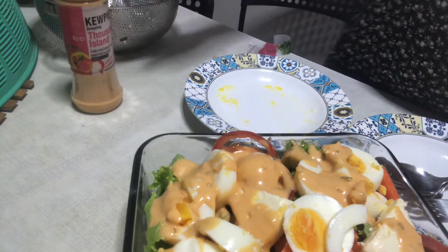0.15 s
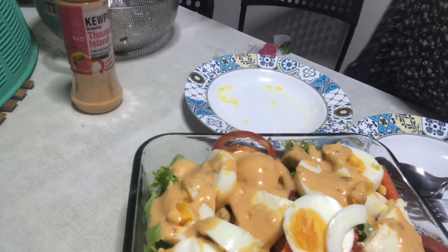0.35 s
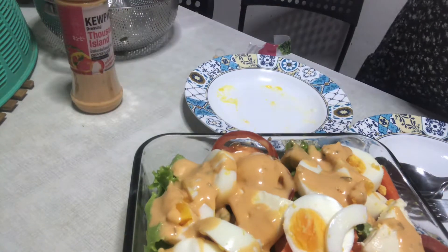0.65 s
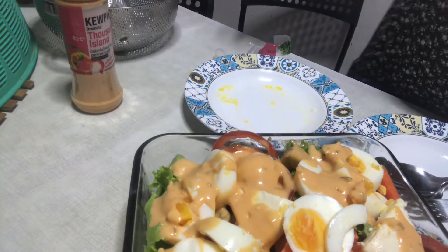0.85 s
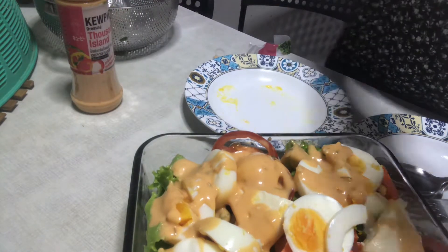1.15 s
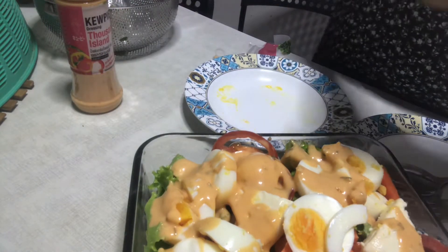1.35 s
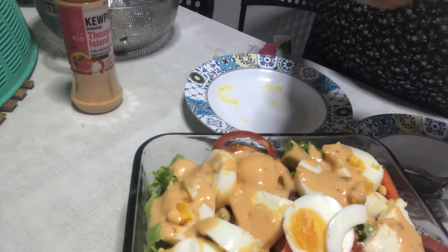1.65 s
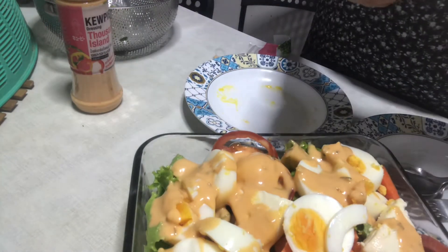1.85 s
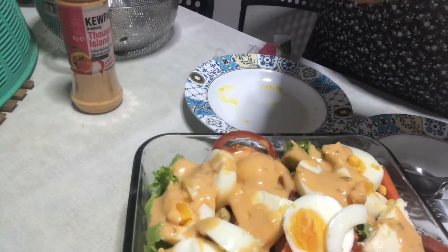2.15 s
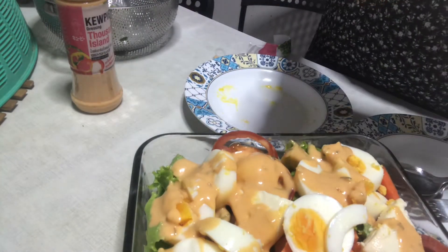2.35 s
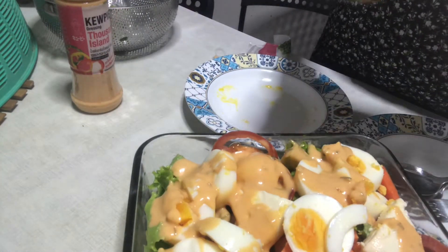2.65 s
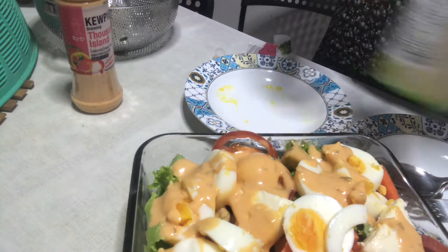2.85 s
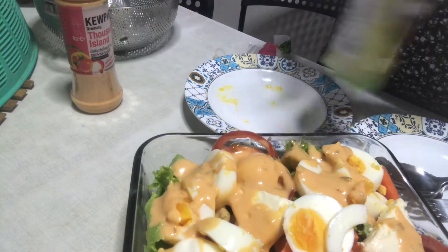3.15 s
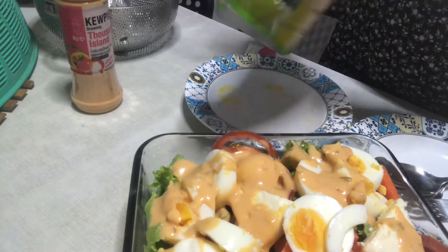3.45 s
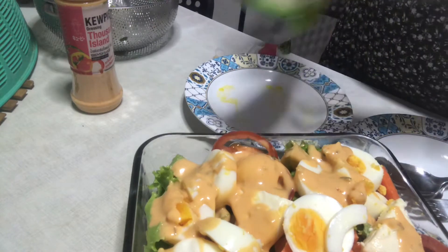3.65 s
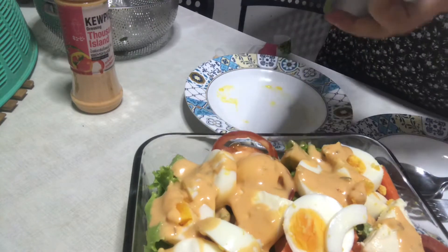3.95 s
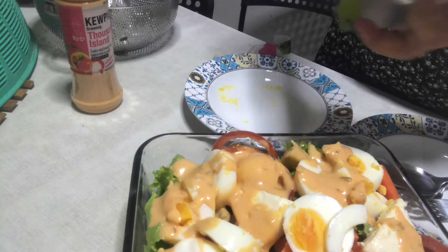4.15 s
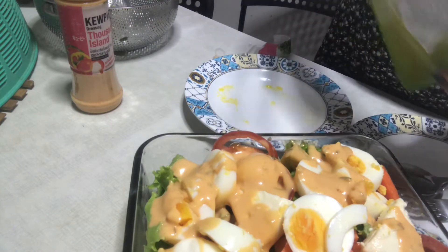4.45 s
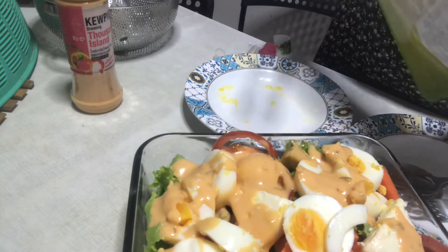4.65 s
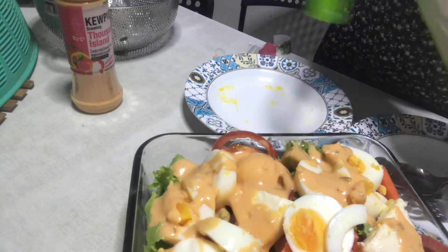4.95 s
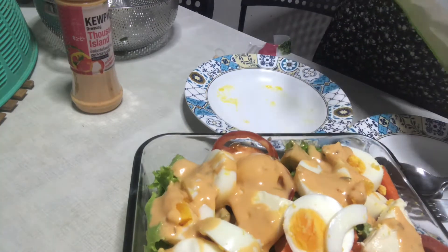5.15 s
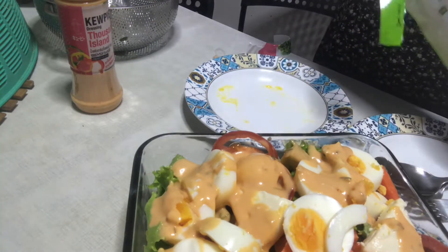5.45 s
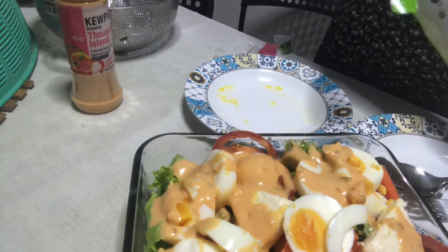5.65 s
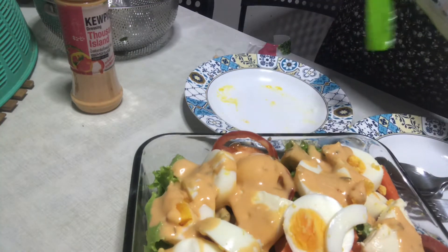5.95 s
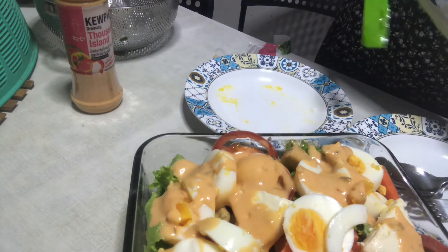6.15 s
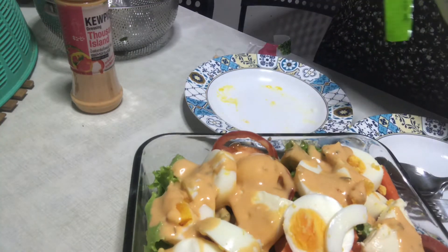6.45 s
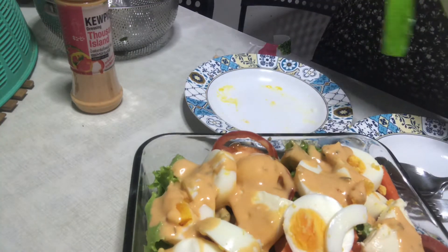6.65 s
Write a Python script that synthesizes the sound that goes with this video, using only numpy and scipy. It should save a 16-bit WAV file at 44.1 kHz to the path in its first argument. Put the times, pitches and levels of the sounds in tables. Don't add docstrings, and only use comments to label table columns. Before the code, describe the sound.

Dry, bright foil crackling, very near, with soft low puffs of squeezed air. It begins sparsely, has one hard snap, falls nearly silent, then returns as a strong crush followed by almost continuous rustling and popping until the end. The kitchen adds only a short, faint reverberation over low steady hum; the sound is mono.

```python
import sys
import numpy as np
from scipy import signal
from scipy.io import wavfile
from scipy.ndimage import uniform_filter1d

SR = 44100
rng = np.random.default_rng(int(sys.argv[2]) if len(sys.argv) > 2 else 0)


def materialize(psi):
    bounded = np.clip(np.atleast_2d(psi).T, -1, 1)
    quanta = np.round(bounded * 32767).astype(np.int16)
    wavfile.write(sys.argv[1], SR, quanta)


def linear_from_db(decibels):
    return 10 ** (np.asarray(decibels, float) / 20)


N = 300321


def evened(x):
    return x / np.sqrt(np.mean(x ** 2) + 1e-20)


def read(points, hz):
    point_hz, value = np.transpose(points)
    return np.interp(np.log(hz + 1), np.log(point_hz + 1), value)


def causal(db):
    log_gain = np.log(linear_from_db(np.r_[db, db[-2:0:-1]]))
    return np.fft.ifft(np.exp(np.conj(signal.hilbert(log_gain)))).real[:2048]


def band(x, lo_hz, hi_hz):
    return signal.sosfilt(signal.butter(2, [lo_hz, hi_hz], "band", fs=SR, output="sos"), x)


def ring(t, hz, t60_s, rise_s=.0002):
    return np.sin(2 * np.pi * hz * t) * linear_from_db(-60 * t / t60_s) * (1 - np.exp(-t / rise_s))


# pitch_hz [Hz], level_db [dB per Hz]
AIR_SPECTRUM = [(18, -55.5), (35, -38.5), (50, 13.5), (75, -15), (130, -3.5), (300, -1.5), (420, -10),
                (1000, -11.5), (4300, -14), (8000, -22), (11000, -22.5), (16500, -33.5)]


def room_tone():
    real, imaginary, patches = rng.standard_normal((N // 512 + 5, 1025, 3)).T
    patches = uniform_filter1d(patches, size=16, axis=0)
    patches = evened(uniform_filter1d(patches, size=8, axis=1))
    level_db = read(AIR_SPECTRUM, np.fft.rfftfreq(2048, 1 / SR))[:, None] + 1.277 * patches
    spectrum = (real + 1j * imaginary) * linear_from_db(level_db)
    air = signal.istft(spectrum, nperseg=2048, noverlap=1536)[1][:N]
    return linear_from_db(-57.5) * evened(air)


# pitch_hz [Hz], width_hz [Hz], level_db [dB]
COMPRESSOR = [
    (50.014, 3, -64),
    (98.68, 3, -61.5),
    (150.85, 5.38, -67.5),
    (206.49, 3.625, -77.5),
    (248.42, 3.45, -65),
]


def hum():
    t, out = np.arange(N) / SR, np.zeros(N)
    for pitch_hz, width_hz, level_db in COMPRESSOR:
        pole = np.exp(-np.pi * width_hz / SR)
        drive = rng.standard_normal(N) + 1j * rng.standard_normal(N)
        waver = signal.lfilter([1], [1, -pole], drive)
        line = (1 + 0.55 * waver / waver.std()) * np.exp(2j * np.pi * pitch_hz * t)
        out += linear_from_db(level_db) * evened(line.real)
    return out


# start_s [s], level_db [dB]
HOLDING_LEVEL = [(0, -63), (1.1, -61.5), (1.27, -52), (1.45, -59.5), (1.62, -64.5), (2.35, -64.5),
                 (2.6, -71.5), (4.85, -56.5), (5.05, -44), (5.39, -50), (5.52, -42), (5.76, -44),
                 (5.93, -51), (6.05, -42), (6.29, -48.5), (6.5, -46.5), (6.75, -55), (6.81, -41)]
# peak_s [s], level_db [dB], rise [s per 20 dB], fall [s per 20 dB],
# squeeze_db of the panels [dB]
HAND_GRIPS = [(.48, -41, 0.1185, 0.2811, -4), (0.546, -41.5, 0.0517, 0.2092, 0),
              (.83, -53, 0.967, 0.22, -1.5), (1.112, -33, 0.0213, 0.0905, -2.5),
              (1.215, -39, 0.033, 0.0833, -11.5), (2.503, -42, 0.0887, 0.1247, -6.5),
              (2.56, -44, 0.1888, 0.1589, -5), (2.726, -46.5, 0.1823, 0.2526, -1),
              (2.83, -51.5, 0.4854, 5, -11), (3.05, -36, 0.1904, 0.2693, -7),
              (3.182, -31.5, 0.3097, 0.0786, -4), (3.367, -38.5, 0.0113, 0.2471, -0.5),
              (3.419, -38, 0.174, 0.124, -9.5), (3.66, -52.5, -0.5, 0.8885, -6),
              (3.97, -48.5, 0.3058, 0.6817, 1), (4.21, -48, 0.33, -0.27, 4),
              (4.45, -45, -0.0075, 0.3675, 15.5), (4.538, -32, 0.003, 0.0729, 0),
              (4.618, -34.5, 0.0916, 0.1143, -4.5), (4.77, -44, -0.24, 0.219, 2.5),
              (4.875, -35.5, -0.04, 0.2507, -3), (5.331, -38.5, 0.646, 0.1253, -10),
              (5.459, -36, 0.0773, 0.1026, -15), (6.6, -44, -0.2349, 0.3293, 2)]
# peak_s [s], level_db [dB], rise and fall [s per 20 dB]
FINGER_SLIDES = [
    (.43, -74, -0.1738),
    (1.53, -51, 0.0287),
    (1.73, -64, 0.3311),
    (3.66, -57.5, 0.73),
    (3.88, -61.5, 3.1677),
    (4.485, -49.5, 0.2353),
    (6.4, -45.5, 0.1379),
]
# start_s (centre) [s], dip_db [dB], half_length_s [s]
FINGER_RESTS = [(0.448, -3.5, 0.0136), (0.51, -1.5, 0.01285), (0.604, -4.5, 0.01541), (3.014, -1, 0.00931),
                (2.472, -7.5, 0.02431), (2.685, -7, 0.02582), (2.772, -2.5, 0.0153), (2.937, -7.5, 0.0234),
                (3.325, -4.5, 0.02263), (3.585, -8, 0.0525), (3.739, -3, 0.04085), (4.029, -4, 0.0324),
                (4.143, -8, 0.04584), (4.331, -2.5, 0.0333), (4.737, -8.5, 0.03616), (4.812, -4, 0.02344),
                (5.219, -5, 0.01647), (5.278, -6.5, 0.01767), (5.413, 1, 0.0187), (5.717, -3, 0.01588),
                (5.782, -1.5, 0.01135), (5.831, -3, 0.01484), (5.931, 1, 0.02069), (6.099, -5.5, 0.02455),
                (6.298, -4, 0.03687), (6.756, -1, 0.02014), (6.529, -2, 0.0318)]
# start_s [s], treble_db [dB]
FACE_TURNS = [(0, -0.5), (.6, 1), (1.1, 1), (2.4, -2), (2.93, -5), (3.05, 3.5), (3.15, -1.5), (3.25, 0.5),
              (3.5, -1.5), (4.1, 2), (4.6, 2.5), (4.8, 1.5), (5.1, 2.5), (5.4, -1.5), (5.65, 0.5),
              (5.8, -1), (6.2, 2), (6.81, 4)]


def hands():
    t = np.arange(0, N / SR + .002, .002)
    peak_s, level_db, rise, fall, squeeze_db = np.transpose(HAND_GRIPS)[:, :, None]
    away = np.where(t < peak_s, (peak_s - t) / abs(rise), (t - peak_s) / abs(fall))
    grips = level_db - 20 * away
    peak_s, level_db, span = np.transpose(FINGER_SLIDES)[:, :, None]
    slides = level_db - 20 * abs(t - peak_s) / abs(span)
    held = np.interp(t, *np.transpose(HOLDING_LEVEL))
    moves = np.r_[grips, slides, [held]]
    work_db = moves.max(0)
    share = linear_from_db(2 * (moves - work_db))
    share = share / share.sum(0)
    squeezes = np.r_[squeeze_db[:, 0], np.full(len(FINGER_SLIDES), -22.5), -11]
    sliding = share[len(HAND_GRIPS):-1].sum(0)
    bright_db = -0.8289 - 0.0211 * (work_db + 50) + 12 * sliding
    bright_db = bright_db + np.interp(t, *np.transpose(FACE_TURNS))
    for start_s, dip_db, half_s in FINGER_RESTS:
        work_db = work_db + dip_db * np.exp(-((t - start_s) / half_s) ** 2)
    return [np.interp(np.arange(N) / SR, t, curve) for curve in (work_db, bright_db, squeezes @ share)]


def grains(lo_hz, hi_hz, per_s, spread_db, cycles, crack, clumps, count=16):
    size = linear_from_db(spread_db * np.minimum(rng.exponential(1, N), 2.7)) * rng.choice([-1, 1], N)
    size *= rng.random(N) < per_s * clumps / SR
    facet, t, out = rng.integers(0, count, N), np.arange(1500) / SR, np.zeros(N)
    for k, hz in enumerate(np.geomspace(lo_hz, hi_hz, count)):
        burst = rng.standard_normal(len(t)) * linear_from_db(-60 * t / 0.01625) * (1 - np.exp(-t / 0.0002036))
        shape = evened(ring(t, hz, cycles / hz, 0.0965 / hz)) + crack * evened(burst)
        out += signal.oaconvolve(size * (facet == k), shape)[:N]
    return evened(out)


# pitch_hz [Hz], level_db [dB per Hz]
FOIL_SPECTRUM = [(180, -46), (300, -9.5), (526, -1), (794, -11), (1050, 2.5), (1510, -1.5), (2170, -4),
                 (3450, -5), (5950, -10), (10300, -17.5), (12700, -15.5), (15500, -26)]


def crinkle(work_db, bright_db, squeeze_db):
    drift = uniform_filter1d(uniform_filter1d(rng.standard_normal(N), size=400), size=300)
    clumps = np.exp(.45 * evened(drift))
    rub = .42 * clumps ** .5 * rng.standard_normal(N)
    raw = grains(700, 5000, 1000, 3.8, 14.5, 1.1, clumps) + rub
    hz, power = signal.welch(raw, SR, nperseg=128)
    bins = np.fft.rfftfreq(4096, 1 / SR)
    colour_db = read(FOIL_SPECTRUM, bins) - np.interp(bins, hz, 10 * np.log10(power))
    foil = signal.oaconvolve(raw, causal(colour_db))[:N]
    low = signal.oaconvolve(foil, signal.firwin(31, 5200, fs=SR), "same")
    foil = (low + linear_from_db(bright_db) * (foil - low)) / low.std()
    panels = grains(73.634, 994.63, 1200, 5.342, 9.293, .01, np.sqrt(clumps), count=12)
    panels = evened(band(panels, 118.45, 953.1))
    return linear_from_db(work_db) * (foil + linear_from_db(squeeze_db - 4.0) * panels)


# pitch_hz [Hz], width_hz [Hz], level_db [dB]
POUCH_MODES = [
    (1120, 163.98, -17),
    (2800, 2568, -11),
]


def snap(level_db, pitch_hz, fizz_db, thump_db, dice, noise):
    t = np.arange(len(noise)) / SR
    tearing = t / (.0001 + .0006 * dice[3] ** 2)
    tear = noise * tearing * np.exp(-tearing)
    overtone_hz = min(pitch_hz * (1.4 + .8 * dice[0]), 9000)
    facet = ring(t, pitch_hz, .002 + 8 / pitch_hz) + .25 * ring(t, overtone_hz, .003)
    stretch = 0.8633 + 0.44942 * dice[1]
    pouch = sum(linear_from_db(db) * ring(t, hz * stretch, 4.559 / width_hz) for hz, width_hz, db in POUCH_MODES)
    rung = signal.fftconvolve(tear, facet + pouch)[:len(t)]
    crack = band(tear, 1500, 7000)
    scatter = evened(band(noise, 1068.4, 4041.9)) * linear_from_db(-60 * t / 0.019137) * (1 - np.exp(-t / 0.001256))
    body = 0.89944 * rung / abs(rung).max() + 0.5978 * scatter + 0.48194 * crack / abs(crack).max()
    hiss = evened(band(noise[::-1], 4500, 12500))
    fizz = hiss * linear_from_db(-60 * t / 0.013 + fizz_db - 8.5) * (1 - np.exp(-t / 0.0002))
    dull = evened(band(np.roll(noise, 700), 220, 800))
    thump = dull * linear_from_db(-60 * t / (.03 + .02 * dice[2]) + thump_db - 1) * (1 - np.exp(-t / .003))
    return linear_from_db(level_db) * (body + fizz + thump)


def snap_series(rows):
    out = np.zeros(N + 2048)
    for start_s, *row in rows:
        out[round(start_s * SR):][:2048] += snap(*row, rng.random(4), rng.standard_normal(2048))
    return out[:N]


# start_s [s], level_db (peak) [dB], pitch_hz of the facet [Hz]
CREASE_TICKS = [(0.4231, -38, 2159), (0.528, -27.5, 4213), (0.7243, -43, 2560), (0.7738, -47, 1927),
                (1.0435, -48, 2762), (1.0745, -39, 1752), (1.087, -41, 1803), (1.2256, -27, 1208),
                (1.2828, -35.5, 1208), (1.2975, -47, 2459), (1.3092, -39.5, 989.8), (1.4048, -42.5, 1511),
                (1.4426, -44, 1245), (1.5176, -48, 1122), (1.604, -43, 1503), (1.6861, -49.5, 1508),
                (1.7018, -46, 1933), (1.745, -43.5, 906.7), (1.7725, -45.5, 1690), (1.9552, -44, 1335),
                (2.3051, -42, 1753), (2.4055, -44, 2950), (2.4943, -28, 1975), (2.5143, -24, 3800),
                (2.5543, -19.5, 1420), (2.583, -31, 1198), (2.9965, -24, 2606), (3.0373, -29.5, 1291),
                (3.0642, -17.5, 3195), (3.0924, -22, 1207), (3.17, -22, 1212), (3.2146, -31, 1640),
                (3.2447, -41, 1239), (3.335, -36, 1500), (3.3897, -33.5, 1377), (3.3949, -30, 1078),
                (3.4138, -21.5, 1201), (3.6687, -38.5, 1026), (3.7752, -43.5, 1334), (3.7801, -41.5, 1080),
                (3.8399, -32.5, 956.7), (3.9218, -44.5, 1172), (3.993, -32, 1050), (4.0439, -33, 908.4),
                (4.067, -44, 1031), (4.0878, -32, 1206), (4.1556, -38, 1041), (4.2048, -31, 1390),
                (4.2718, -41.5, 910.4), (4.2774, -37, 1714), (4.4234, -39, 1978),
                (4.5865, -28.5, 4507), (4.597, -17.5, 1302), (4.606, -25, 1483), (4.626, -28, 1167),
              (4.7621, -22.5, 1253), (4.776, -32, 3018), (4.9341, -28, 1077), (4.9784, -33, 1256),
              (5.0435, -34, 1425), (5.1029, -34, 3892), (5.117, -27.5, 3551), (5.265, -30, 1093),
              (5.48, -24.5, 1411), (5.4674, -18.5, 1566), (5.593, -34, 1426), (5.6709, -34, 1428),
              (5.679, -34.5, 3405), (5.7507, -37, 1050), (5.791, -35, 1565), (5.7963, -34.5, 3304),
              (5.8055, -36, 4357), (5.8975, -32.5, 884.8), (5.9023, -31.5, 1548), (5.943, -28, 2800),
              (5.9909, -47.5, 2754), (6.0325, -38.5, 1065), (6.2096, -33, 1753), (6.3358, -43, 1394),
              (6.383, -27.5, 2927), (6.42, -31, 1686), (6.4302, -38, 1553), (6.483, -33.5, 1851),
              (6.4932, -38.5, 1003), (6.5014, -31.5, 1509), (6.5158, -41, 991), (6.552, -34.5, 983.4),
              (6.567, -31.5, 1931), (6.58, -35.5, 1634), (6.806, -31.5, 3008)]


def ticks():
    return snap_series([(start_s, level_db, pitch_hz, -11.5 - 17.5 * rng.random(), -23)
                        for start_s, level_db, pitch_hz in CREASE_TICKS])


# start_s [s], level_db (peak) [dB], pitch_hz [Hz]
AIR_PUFFS = [(0.429, -59, 101.5), (0.524, -33, 94.16), (0.57, -37, 139.6), (0.708, -37.5, 62.01),
             (1.101, -32, 83.59), (3.18, -38.5, 114.8), (3.356, -37, 101.1), (3.778, -39.5, 58.96),
             (4.155, -43, 89.7), (4.43, -38.5, 93.46), (4.526, -33.5, 57.65), (4.589, -39, 59.02),
             (4.867, -36, 77.13), (5.147, -42.5, 95.96)]


def puffs():
    t, out = np.arange(4096) / SR, np.zeros(N + 4096)
    for start_s, level_db, pitch_hz in AIR_PUFFS:
        out[round(start_s * SR):][:4096] += linear_from_db(level_db - 3.5) * ring(t, pitch_hz, 0.18654, 0.004655)
    return out[:N]


# start_s [s], level_db (peak) [dB], pitch_hz of the facet [Hz], fizz_db
# against the peak [dB]
BRIGHT_CRACKS = [(.4294, -33.5, 4139, 5), (.4713, -24, 6614, 5.5), (.4798, -24, 4204, -5),
                 (.5357, -19.5, 3974, 5.5), (.7108, -33, 2751, -1.5), (1.0306, -36.5, 3298, 7.5),
                 (1.0995, -11, 1839, -5.5), (1.1318, -20, 1931, 7), (1.7325, -38.5, 3673, 3.5),
                 (2.4483, -28, 1055, -6.5), (2.5182, -23, 3735, 2), (2.5596, -20, 1603, -2.5),
                 (2.6304, -24.5, 4487, 1.79), (2.7237, -24, 1063, 1.5), (2.7551, -28, 3346, -10.5),
                 (2.795, -23.5, 2054, 2), (2.9622, -20.5, 3539, 0), (2.9786, -23.5, 1120, 7.5),
                 (3.0025, -25.5, 2692, 11), (3.0295, -21, 5917, 3.5), (3.044, -20.5, 3265, 7.5),
                 (3.0575, -17.5, 2785, -3), (3.0774, -11.5, 2402, 6), (3.1213, -18.5, 2284, 7.5),
                 (3.1333, -9.5, 2695, 1), (3.1887, -19.5, 1111, -1), (3.1981, -18.5, 1372, -9),
                 (3.3523, -34, 1393, 10.5), (3.3638, -13, 2204, 1), (3.4476, -19, 2350, -3),
                 (3.873, -30, 969.8, -16), (3.9088, -30, 990.2, -9), (3.971, -15.5, 1163, 0),
               (4.2176, -13.5, 2296, 0.551), (4.4634, -17, 2518, -9), (4.5322, -13, 3049, 3.5),
               (4.5641, -24.5, 2800, -2), (4.601, -18.5, 2261, 1), (4.6187, -15.5, 3504, 4.5),
               (4.6327, -16.5, 1378, -7), (4.7226, -22, 2800, -5), (4.762, -27, 1292, 11),
               (4.8659, -19, 3752, 4), (4.8947, -20.5, 5530, -2), (4.9569, -23, 1189, 1.5),
               (4.9643, -16, 3097, -3.5), (5.019, -23.5, 2659, -5.5), (5.1088, -23, 1236, 1),
               (5.1545, -15.5, 3033, -2.5), (5.2521, -15, 1376, -5), (5.3029, -21, 2618, -4),
               (5.3108, -25.5, 5792, -9.5), (5.4453, -25, 1118, -2.5), (5.4565, -15, 6270, -3),
               (5.539, -20.5, 2730, -1), (5.7211, -26.5, 3587, -16.5), (5.8386, -19, 3606, 0),
               (6.3964, -19, 5420, 0.5), (6.5908, -19.5, 3587, -7), (6.771, -25, 4060, 4)]


def cracks(squeeze_db):
    rows = []
    for start_s, level_db, pitch_hz, fizz_db in BRIGHT_CRACKS:
        thump_db = -13.5 + 0.604 * squeeze_db[round(start_s * SR)] - 7.5 * rng.random()
        rows.append((start_s, level_db, pitch_hz, fizz_db, thump_db))
    return snap_series(rows)


# peak_s [s], level_db [dB], rise and fall [s per 20 dB], pitch_hz [Hz]
PANEL_RUSTLES = [(.485, -40, -0.0524, 6239), (.545, -44, 0.1385, 4926), (1.099, -33, .01, 1000),
                 (1.215, -35, .07, 1500), (2.517, -32.5, -0.0166, 1217), (2.58, -40, 0.0298, 1255),
                 (2.915, -39, 0.0159, 1164), (3.43, -46, 0.1202, 1251), (3.97, -49.5, 0.3047, 1011),
                 (4.2, -48, -0.1424, 1305), (4.27, -47, 0.1352, 1024), (4.45, -44.5, 0.2375, 1092),
                 (4.64, -37.5, 0.1934, 1311), (4.77, -47.5, 0.1245, 551.5), (4.91, -46.5, 0.053, 508.3),
                 (5.06, -42.5, 0.021, 647.5), (5.33, -48, 0.4938, 863.1), (5.67, -43.5, 0.0423, 3501),
                 (5.8, -45.5, 0.0018, 3446), (6.05, -45.5, 0.166, 3608), (6.43, -51, 1.36, 2177),
                 (.5, -48.5, 0.2008, 332.2), (3.165, -35.5, 0.1024, 336.9), (1.16, -39, 0.0719, 1002),
                 (2.514, -45, -0.0923, 3182), (2.556, -43, .015, 4526), (4.6, -37, -0.0015, 2583),
                 (4.45, -43, 0.0239, 276.1), (4.885, -44.5, 0.1923, 442.2), (6.56, -46, -0.01, 418),
                 (6.72, -50.5, -0.1352, 511.6)]


def rustles():
    grain = evened(uniform_filter1d(rng.standard_normal(N), size=120))
    rub, out = rng.standard_normal(N) * linear_from_db(5.5 * np.minimum(grain, 2)), np.zeros(N)
    width = 1.3174
    for peak_s, level_db, span, pitch_hz in PANEL_RUSTLES:
        at = slice(round((peak_s - .3) * SR), round((peak_s + .3) * SR))
        panel = evened(band(rub[at], pitch_hz / width, pitch_hz * width))
        away_s = abs(np.arange(N)[at] / SR - peak_s)
        out[at] += panel * linear_from_db(level_db - 20 * away_s / abs(span))
    return out


# start_s [s], level_db (peak) [dB], pitch_hz of the facet [Hz], thump_db against
# the peak [dB]
DULL_POPS = [(.623, -30, 1854, -24.5), (.815, -34, 1857, -22), (1.054, -31.5, 2800, -13.5),
             (1.1044, -17.5, 1120, -6), (1.1195, -22, 1880, -4), (1.2092, -23, 1167, -29.5),
             (1.2316, -35, 1157, -32.5), (1.2615, -40.5, 1240, -28), (1.3209, -37, 3512, -24.5),
             (1.3848, -33, 1120, -29), (1.5823, -23.5, 1338, -35.5), (1.711, -37.5, 2492, -9),
             (2.3645, -37, 2800, -18.5), (2.4299, -26.5, 1103, -24), (2.7077, -33, 1375, -22),
             (2.8165, -27, 3138, -22.5), (2.8429, -30, 1119, -10), (2.9158, -24, 1138, -21),
             (3.0964, -19.5, 1422, -12), (3.1423, -20.5, 1267, -24.5), (3.1597, -13.5, 1066, -8.5),
             (3.1757, -23, 2416, -19.5), (3.2316, -23, 6717, -30), (3.3747, -23, 3033, -22.5),
             (3.4032, -20, 1173, -31), (3.4087, -21, 1185, -29.5), (3.4575, -27.5, 1201, -1),
             (3.6479, -29.5, 1208, -5), (3.6803, -32.5, 1242, -14.5), (3.78, -28, 1120, -17),
               (3.8464, -31.5, 1120, -5.5), (3.9362, -27.5, 2492, -27.5), (4.047, -30, 1029, -3),
               (4.081, -27.5, 3895, -0.5), (4.165, -27, 1167, -14), (4.1881, -22.5, 2228, -7.5),
               (4.1946, -21.5, 1647, -10), (4.25, -24, 1185, -26), (4.2603, -30.5, 1353, -2.5),
               (4.2898, -28, 2958, -11), (4.353, -19, 3300, -26), (4.377, -22, 1258, -9.5),
               (4.4096, -30, 1290, -8.5), (4.4351, -16.5, 1373, -12.5), (4.5105, -29.5, 991.5, -13),
               (4.5474, -21, 1247, -34), (4.6556, -23.5, 1370, -12), (4.6771, -21, 1367, -8),
               (4.69, -29, 1062, -2.5), (4.7568, -20.5, 3783, -5.5), (4.8256, -31.5, 1227, -25.5),
               (4.916, -27, 3711, 2),
             (5.013, -23.5, 1966, -10), (5.0647, -27.5, 3536, -3.5), (5.1658, -31.5, 1615, -9.5),
             (5.239, -23, 2055, -16), (5.3154, -20.5, 1507, -15.5), (5.3383, -19.5, 1567, -26),
             (5.389, -25, 2256, -23), (5.418, -26.5, 1326, -20), (5.473, -19.5, 2760, -4.5),
             (5.5281, -21, 3221, -27), (5.5548, -27, 1557, -3.5), (5.5774, -23, 3652, -16),
             (5.6428, -27, 1618, -8.5), (5.7344, -25.5, 1548, -6.5), (5.8301, -29.5, 1754, -5),
             (5.8739, -30, 1636, -9.5), (5.967, -21, 1673, -15), (6.1367, -19, 1586, -17),
             (6.1712, -30.5, 2676, -19.5), (6.2801, -33, 2571, -27.5), (6.4685, -30.5, 3110, -26.5),
             (6.511, -24, 2491, -6.5), (6.6209, -25, 2015, -11), (6.7233, -25, 2892, -9),
             (6.791, -28, 2999, -23.5)]


def pops():
    return snap_series([(start_s, level_db, pitch_hz, -26.5 - 16.5 * rng.random(), thump_db)
                        for start_s, level_db, pitch_hz, thump_db in DULL_POPS])


# pitch_hz [Hz], t60_s [s]
KITCHEN_DECAY = [
    (300, 0.3216),
    (1300, 0.2385),
    (3500, 0.1468),
    (9000, 0.0699),
]


def kitchen(x):
    taps = np.zeros(SR // 2)
    at = np.arange(260, len(taps) - 20, 20)
    taps[at + rng.integers(0, 20, len(at))] = rng.choice([-1., 1.], len(at))
    hz, t, z = signal.stft(taps, SR, nperseg=256)
    decay = linear_from_db(-60 * t / read(KITCHEN_DECAY, hz)[:, None])
    tail = signal.istft(z * decay, SR, nperseg=256)[1]
    return signal.fftconvolve(x, tail / np.linalg.norm(tail))[:N]


def scene():
    room = room_tone() + hum()
    work_db, bright_db, squeeze_db = hands()
    packet = crinkle(work_db, bright_db, squeeze_db)
    packet = packet + ticks() + puffs() + cracks(squeeze_db) + rustles() + pops()
    echo = linear_from_db(-18) * kitchen(packet)
    return (packet + echo + room)[None]


def band_limit(x):
    return signal.sosfilt(signal.butter(12, 16970, fs=SR, output="sos"), x)


# pitch_hz [Hz], width_hz [Hz], level_db [dB]
HOUSING_NOTCHES = [
    (4968, 275.7, -3),
    (10985, 2633.6, -5.5),
]


def record(dry):
    hz = np.fft.rfftfreq(4096, 1 / SR)
    edge_db = -26 * np.clip((hz - 15850) / 150, 0, 1) - 70 * np.clip((hz - 16950) / 300, 0, 1)
    notch_db = sum(db * np.exp(-((hz - centre) / width) ** 2) for centre, width, db in HOUSING_NOTCHES)
    mix = signal.oaconvolve(dry, causal(edge_db + notch_db)[None])[:, :N]
    return band_limit(mix)


dry = scene()
out = record(dry)
materialize(out)
```